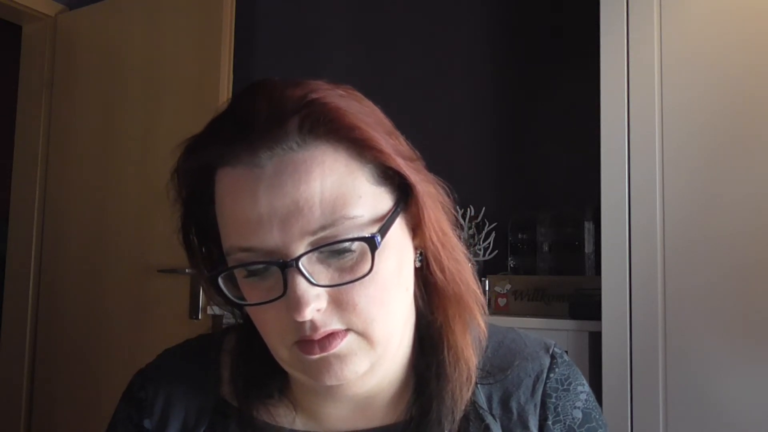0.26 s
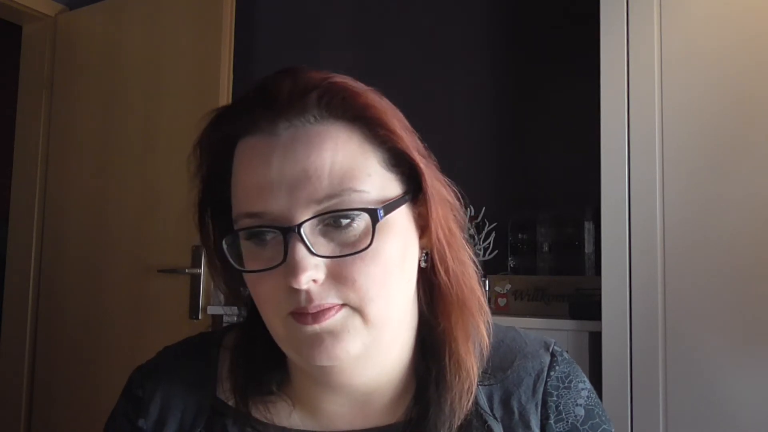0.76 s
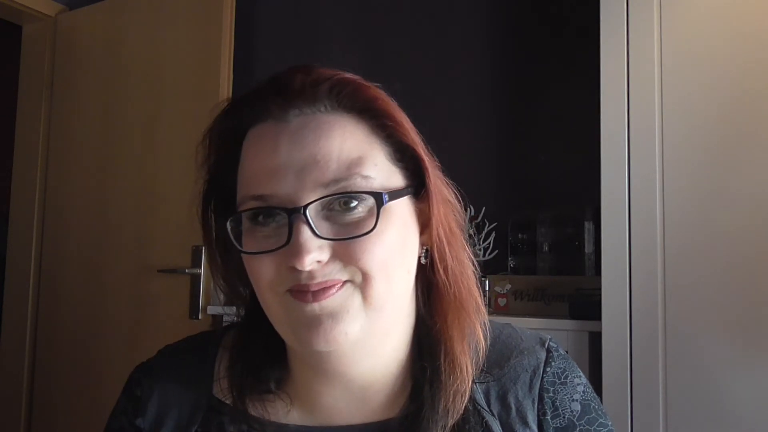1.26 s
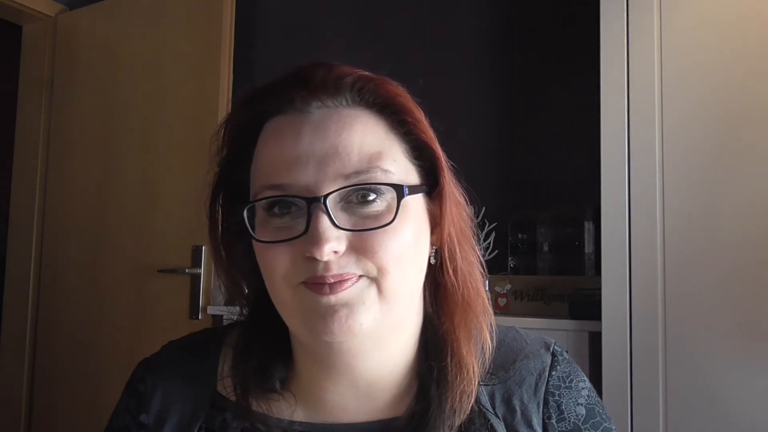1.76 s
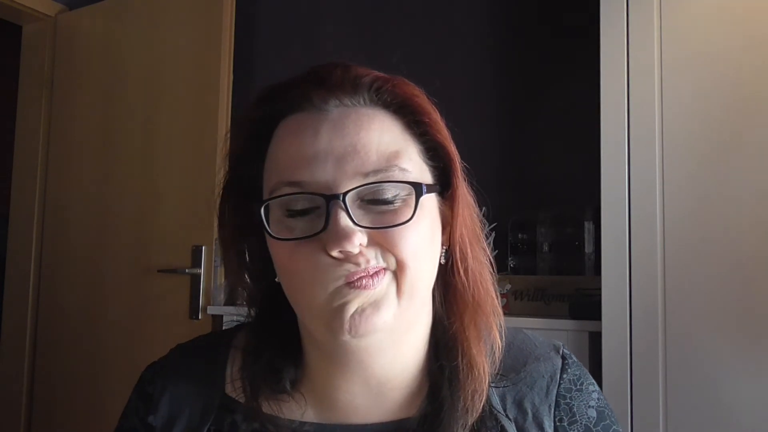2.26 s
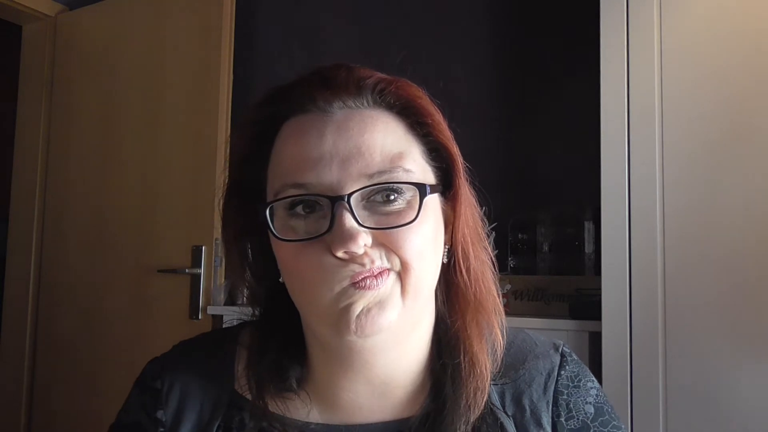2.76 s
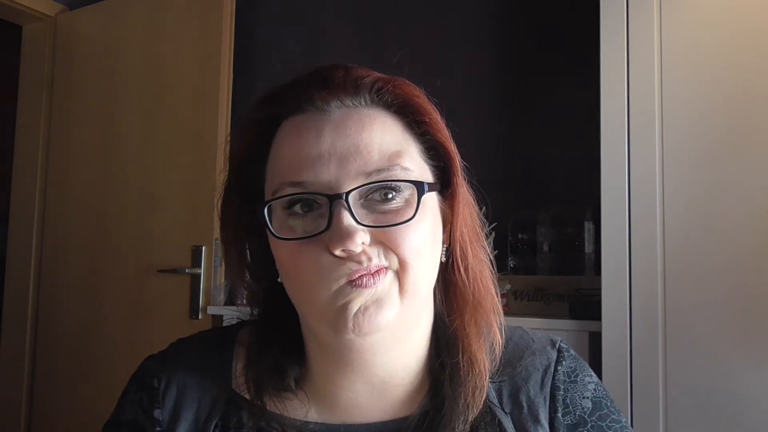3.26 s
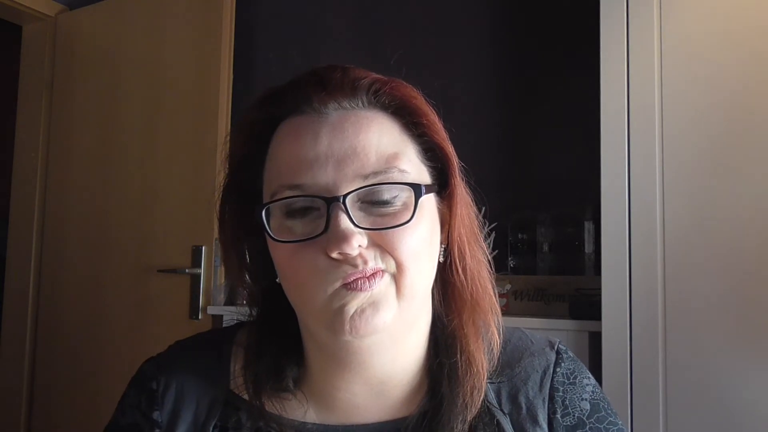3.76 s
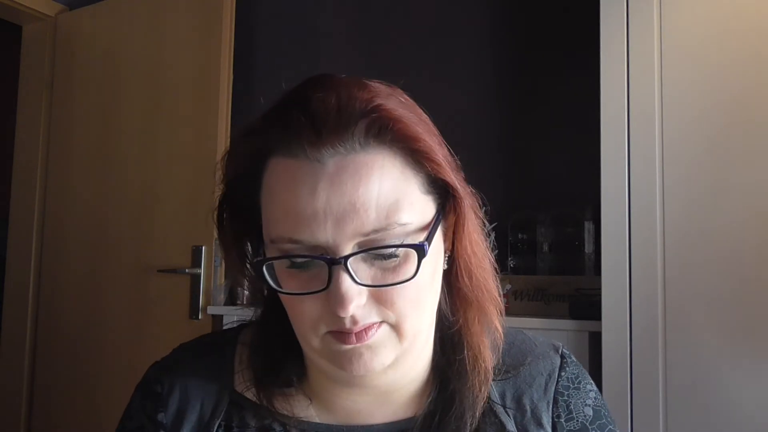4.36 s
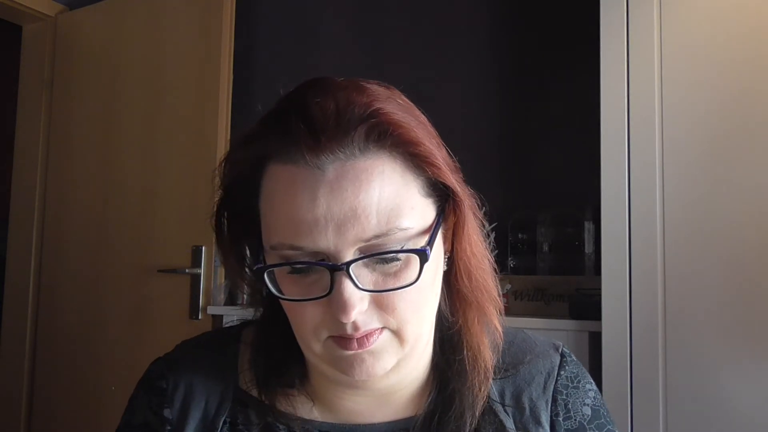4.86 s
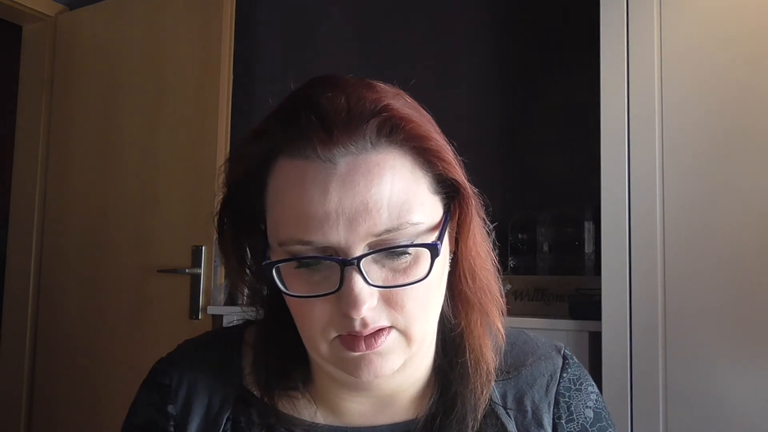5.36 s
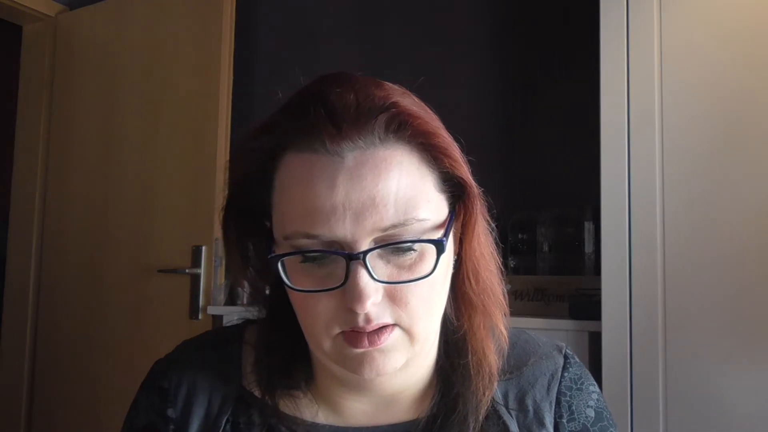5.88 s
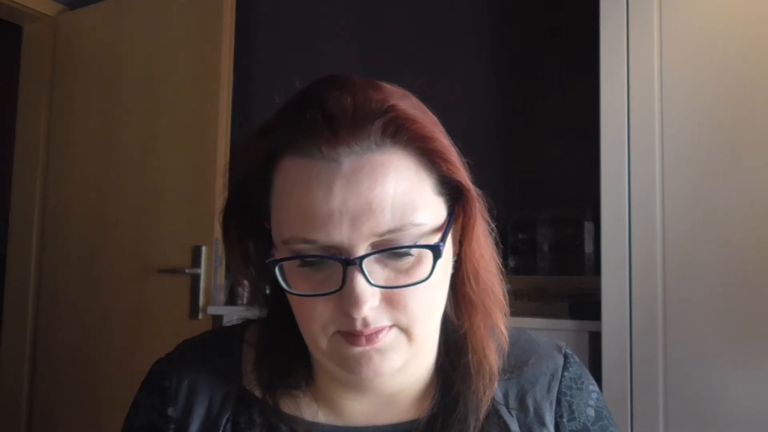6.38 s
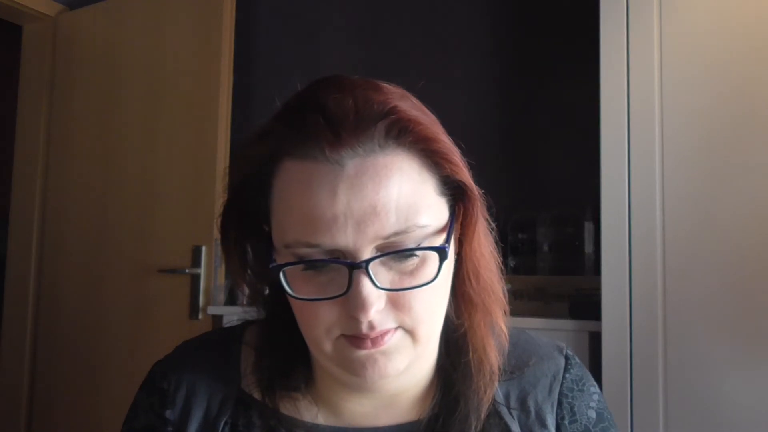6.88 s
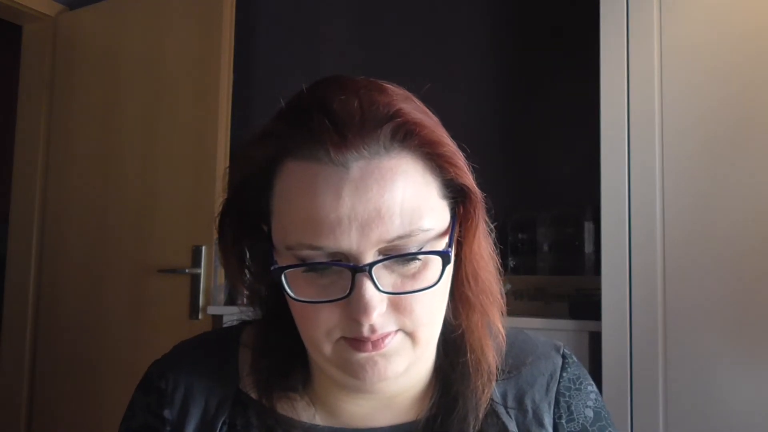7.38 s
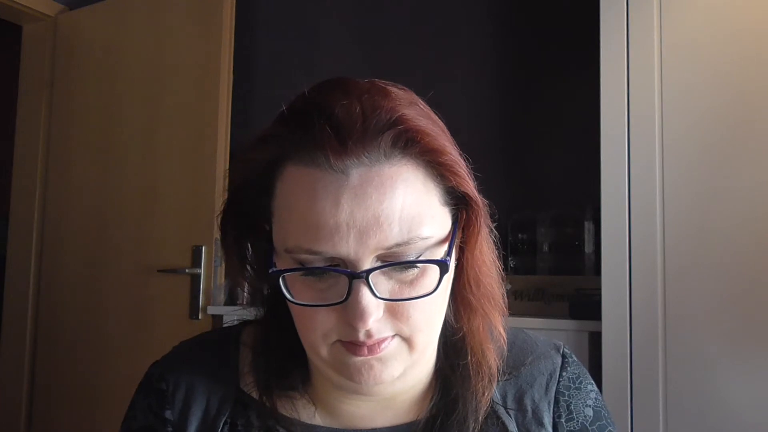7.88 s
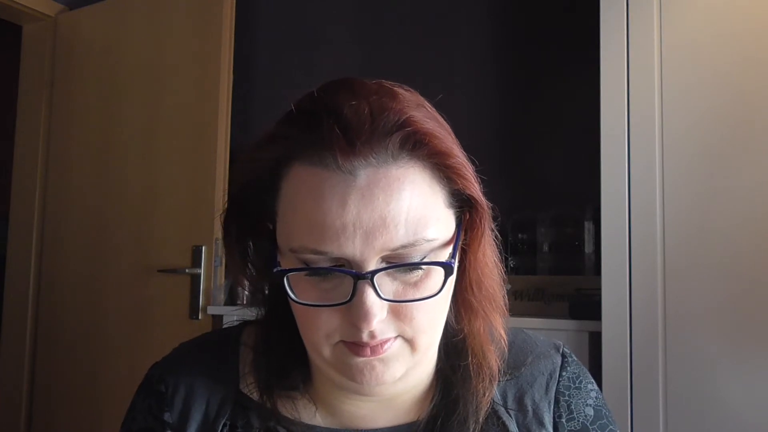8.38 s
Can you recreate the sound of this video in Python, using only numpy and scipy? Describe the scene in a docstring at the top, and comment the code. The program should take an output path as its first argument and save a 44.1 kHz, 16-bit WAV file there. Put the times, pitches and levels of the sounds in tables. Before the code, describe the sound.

Close in a small room, wrapping paper is picked at, rustled and torn in sharp rips over a hollow box, with a faint fan behind.

```python
"""Gift paper on a cardboard box rips, rustles and crinkles, close to the microphone in a small room.
Rips, rustle and creases are random fractures or short noise bursts, coloured by spectra.
Fingernail flicks add a scrape, a click and a hollow box knock; a fingertip scuffs the cardboard.
Bumps and friction drive the resonances of the box on the desk.
A fan hums faintly as coloured noise and wavering tones, with microphone hiss."""
import sys
import numpy as np
from scipy import signal
from scipy.fft import rfft, irfft
from scipy.io import wavfile
from scipy.ndimage import uniform_filter1d

SR = 44100
rng = np.random.default_rng(int(sys.argv[2]) if len(sys.argv) > 2 else 0)


def inscribe(sig):
    """Save sig as 16-bit PCM at rate SR to the path in sys.argv[1].

    A 1-D sig is mono; a 2-D sig holds one channel per row.
    Samples are clipped to [-1, 1] before scaling.
    """
    pcm = np.round(np.clip(np.atleast_2d(sig).T, -1, 1) * 32767)
    wavfile.write(sys.argv[1], SR, pcm.astype(np.int16))


N = 380583
SAMPLES_PER_MS = SR / 1000


def from_db(db):
    """Decibels to gain."""
    return 10 ** (np.asarray(db) / 20)


def rms_one(x):
    """Scale to rms 1."""
    return x / np.sqrt(np.mean(x ** 2) + 1e-20)


def unit_energy(x):
    """Scale each response to energy 1."""
    return x / np.sqrt(np.sum(x ** 2, axis=-1, keepdims=True) + 1e-20)


def gains(rows):
    """The dB columns of a curve as gains at every sample, silent outside it."""
    time_s, *columns_db = np.transpose(rows)
    t = np.arange(N) / SR
    inside = (t >= time_s[0]) * (t <= time_s[-1])
    return np.array([from_db(np.interp(t, time_s, db)) * inside for db in columns_db])


def at_hz(points, hz, column=1):
    """Read one column of a table on a log-frequency axis."""
    table = np.array(points)
    return np.interp(np.log(np.maximum(hz, 1)), np.log(table[:, 0]), table[:, column])


def drift(rate_hz):
    """Slow random wander: straight lines between Gaussian knots of spread 1."""
    knots = rng.standard_normal(N // 16)
    return np.interp(np.arange(N) * rate_hz / SR, np.arange(len(knots)), knots)


def convolve(x, response):
    """Play a signal through a mono or stereo response."""
    return signal.oaconvolve(np.atleast_2d(x), np.atleast_2d(response), axes=-1)[:, :N]


def causal(spectrum, size=4096):
    """Minimum-phase response of this spectrum, with energy 1."""
    spectrum_db = at_hz(spectrum, np.fft.rfftfreq(size, 1 / SR))
    cepstrum = irfft(np.log(from_db(spectrum_db)))
    # fold onto positive delays
    cepstrum[1:size // 2] *= 2
    cepstrum[size // 2 + 1:] = 0
    return unit_energy(irfft(np.exp(rfft(cepstrum))))


def colour(x, spectrum):
    """Filter that keeps the power of white sound."""
    return convolve(x, causal(spectrum))


def bandpass(x, low_hz, high_hz):
    """Third-order Butterworth band."""
    return signal.sosfilt(signal.butter(3, [low_hz, high_hz], "band", fs=SR, output="sos"), x)


def burst(decay_ms, ring_db, ring_ms, apart=0.23, pan_db=4.5, size=768):
    """One facet of paper flips: a sharp crack and a faint ring, a little different at each ear."""
    t_ms = np.arange(size) / SAMPLES_PER_MS
    shape = np.exp(-t_ms / decay_ms) + from_db(ring_db) * np.exp(-t_ms / ring_ms)
    mid, side = rng.standard_normal((2, size))
    sides = np.array([[1], [-1]])
    pan = from_db(sides * pan_db * rng.normal() / 2)
    return unit_energy(shape * (mid + apart * side * sides)) * pan


def strikes(times_s, levels_db, spectrum, decay_ms, ring_db, ring_ms, size=2048):
    """A burst at each time; its level is its energy spread over one millisecond, before panning."""
    out = np.zeros((2, N + size))
    weight = rms_one(from_db(at_hz(spectrum, np.fft.rfftfreq(size, 1 / SR))))
    for time_s, level_db in zip(times_s, levels_db):
        crack, at = burst(decay_ms, ring_db, ring_ms), int(time_s * SR)
        coloured_rms = np.sqrt(np.mean(np.abs(rfft(crack, size) * weight) ** 2))
        out[:, at:at + crack.shape[1]] += crack * from_db(level_db) * np.sqrt(SAMPLES_PER_MS) / coloured_rms
    return colour(out[:, :N], spectrum)


def fractures(per_s, spread_db, even_ms):
    """Tiny breaks of uneven size at random moments; the steady pull evens their power out."""
    sizes = from_db(spread_db * np.minimum(rng.exponential(1, N), 4))
    clicks = (rng.random(N) < per_s / SR) * sizes
    power = uniform_filter1d(clicks ** 2, max(int(even_ms * SAMPLES_PER_MS), 2))
    return clicks / np.sqrt(np.abs(power) + per_s / SR / 2)


def facets(clicks, decay_ms, ring_db, ring_ms=1.9, count=20):
    """Each break is radiated by one of many facets of the sheet."""
    dealt, signs = rng.integers(0, count, N), rng.choice([-1, 1], N)
    return sum(convolve(clicks * signs * (dealt == k), burst(decay_ms, ring_db, ring_ms))
               for k in range(count))


def wavering_tone(hz, width_hz):
    """A line whose strength and phase wander; rms 1."""
    turn = 2 * np.pi * hz * np.arange(N) / SR
    return rms_one((1 + drift(width_hz)) * np.sin(turn) + drift(width_hz) * np.cos(turn))


def steady_noise(spectrum, level_db, apart):
    """Coloured noise, partly shared by both channels."""
    mid, side = rng.standard_normal((2, N))
    return from_db(level_db) * rms_one(colour(mid + apart * side * [[1], [-1]], spectrum))


# fan noise: (frequency [Hz], relative density [dB per Hz])
FAN_SPECTRUM = [(20, -30.5), (50, -9), (100, -4.5), (140, -2.5), (175, -3.5), (215, 0), (330, -2.5),
                (600, -9.5), (780, -10.5), (930, -3.5), (1150, -14.5), (1550, -12), (2100, -39.5),
                (5700, -27.5)]
# microphone hiss: (frequency [Hz], relative density [dB per Hz])
HISS_SPECTRUM = [(1000, -4.5), (3000, -6.5), (6000, -8), (8000, -2), (11000, 0.5), (14000, -5),
                 (16000, -15.5)]
# fan tones: (frequency [Hz], relative level [dB])
FAN_TONES = [(134.6, -9), (213, -1.5), (931, -11.5)]
# swell of the fan tones: (time [s], level before trim [dB])
FAN_SWELL = [(0, -73.5), (1.5, -69.5), (2.7, -75), (3.2, -70), (4.1, -64), (4.7, -66), (5.6, -66),
             (5.9, -59), (6.9, -66), (7.6, -63), (8, -80), (8.63, -74)]


def background():
    """A fan with wavering tones, and the hiss of the microphone."""
    trim = from_db(-4.0)
    tones = sum(from_db(db) * wavering_tone(hz, width_hz=14) for hz, db in FAN_TONES)
    fan = steady_noise(FAN_SPECTRUM, level_db=-63.5, apart=1.0) + trim * tones * gains(FAN_SWELL)[0]
    return fan + steady_noise(HISS_SPECTRUM, level_db=-68.0, apart=0.8)


# room: (frequency [Hz], t60 [s], reverberant energy against direct [dB])
ROOM_DECAY = [(146, 0.23, -4), (600, 0.2, -3), (1490, 0.3, -4.5), (3960, 0.28, -4), (7700, 0.26, -7),
              (12150, 0.074, -11), (16000, 0.25, -9)]


def room(x, alike=0.53, gap_ms=0.71, wall_ms=8.4, wall_db=-20, count=12):
    """A diffuse tail, decaying at its own rate in each band, and one echo off a near wall."""
    t = np.arange(SR // 2) / SR
    onset = np.clip(t * SR / SAMPLES_PER_MS / gap_ms - 1, 0, 1)
    edges_hz, response = np.geomspace(60, 17000, count + 1), 0
    for low, high in zip(edges_hz, edges_hz[1:]):
        hz, share = np.sqrt(low * high), (high - low) / (SR / 2)
        mid, side = bandpass(rng.standard_normal((2, len(t))), low, high)
        noise = np.sqrt(1 + alike) * mid + np.sqrt(1 - alike) * side * [[1], [-1]]
        shape = onset * np.exp(-np.log(1000) * t / at_hz(ROOM_DECAY, hz))
        level = np.sqrt(share) * from_db(at_hz(ROOM_DECAY, hz, column=2))
        response = response + unit_energy(noise * shape) * level
    for channel in range(2):
        response[channel, int(wall_ms * SAMPLES_PER_MS) + 2 * channel] += from_db(wall_db)
    return convolve(x, response)


# box shoved over the desk: (start [s], length [s], level at start [dB])
DESK_SHOVES = [(1.403, 0.0086, -60.5), (3.39, 0.026, -59.5), (4.388, 0.42, -55), (4.993, 0.072, -59.5),
               (5.305, 0.24, -65), (5.549, 0.3, -61.5), (6.842, 0.013, -59), (7.023, 0.0085, -64.5),
               (7.801, 0.0096, -62)]
SHOVE_ATTACK_S, SHOVE_RELEASE_S, SHOVE_SAG_DB_PER_S = 0.013, 0.018, 18


def shove_level():
    """Friction is strongest as the box starts to move, eases while it slides and dies as it stops."""
    out = 0
    for start_s, length_s, level_db in DESK_SHOVES:
        t = np.arange(N) / SR - start_s
        attack = np.clip(1 + t / SHOVE_ATTACK_S, 0, 1)
        release = np.exp(-np.clip((t - length_s) / SHOVE_RELEASE_S, 0, 20))
        sag_db = SHOVE_SAG_DB_PER_S * np.clip(t, 0, length_s)
        out = out + attack * release * from_db(level_db - sag_db)
    return out


# box bumping on the desk: (time [s], level [dB], its two lowest modes against the others [dB])
DESK_BUMPS = [(3.541, -41, -29), (4.391, -37, -6), (4.396, -33, -4), (4.402, -70, -4), (4.429, -38.5, 2),
              (4.439, -58, 0), (7.869, -52, 11.5)]
# resonances of the box on the desk: (frequency [Hz], width [Hz], relative level [dB])
BOX_DESK_MODES = [(125, 170, -13.5), (188.6, 170, -1), (486, 87, 4.5), (710, 110, -13.5), (1170, 160, -3),
                  (1220, 84, -28)]


def box_on_desk():
    """Bumps and sliding friction drive the same hollow resonances."""
    friction = rng.standard_normal(N) * shove_level()
    time_s, level_db, low_db = np.transpose(DESK_BUMPS)
    t = np.arange(SR // 10) / SR
    modes = np.array([from_db(db) * width_hz * np.exp(-np.pi * width_hz * t) * np.cos(2 * np.pi * hz * t)
                      for hz, width_hz, db in BOX_DESK_MODES])
    out = 0
    for k, mode in enumerate(modes / np.sqrt(np.sum(modes ** 2))):
        force = friction.copy()
        force[(time_s * SR).astype(int)] += np.sqrt(SAMPLES_PER_MS) * from_db(level_db + low_db * (k < 2))
        out = out + convolve(force, mode)
    return bandpass(out + 1e-18, 80, 1600)


# short dull scuffs on the cardboard: (time [s], level [dB])
CARDBOARD_SCUFFS = [(8.209, -39), (8.220, -39.5), (8.229, -48), (8.245, -51), (8.262, -51)]
# scuffed cardboard: (frequency [Hz], relative density [dB per Hz])
SCUFF_SPECTRUM = [(200, -48), (700, -12), (1000, -3.5), (1500, 0), (2200, -8), (3200, -14.5), (6000, -25.5),
                  (15000, -28)]


def scuffs():
    """A fingertip stutters over the cardboard."""
    time_s, level_db = np.transpose(CARDBOARD_SCUFFS)
    return strikes(time_s, level_db, SCUFF_SPECTRUM, decay_ms=5.8, ring_db=-10, ring_ms=6.8)


# fingers brushing over the paper, a row a stroke: (middle [s], length [s], peak level [dB])
FINGER_STROKES = [(0.195, 0.22, -69.5), (0.507, 0.1, -52), (0.577, 0.11, -58.5), (1.388, 0.25, -59.5),
                  (1.88, 0.055, -65), (2.266, 0.1, -64.5), (2.444, 0.049, -52), (2.548, 0.12, -52.5),
                  (2.613, 0.074, -51.5), (2.692, .3, -61.5), (3.007, 0.058, -57), (3.392, 0.16, -54),
                  (3.695, 0.15, -57.5), (3.802, 0.055, -43.5), (4.038, 0.24, -55.5), (4.15, 0.086, -59),
                  (4.443, 0.25, -52.5), (4.56, 0.14, -45.5), (4.65, .12, -57.5), (4.973, 0.33, -59),
                  (5.115, 0.32, -52), (5.331, 0.12, -50), (5.432, 0.042, -46), (5.53, .06, -52.5),
                  (5.63, 0.03, -48.5), (5.722, 0.04, -43.5), (5.806, 0.064, -52), (5.9, 0.022, -45),
                  (6.851, 0.082, -58), (6.996, 0.32, -59.5), (7.227, 0.11, -55), (7.356, 0.3, -63.5),
                  (7.56, 0.43, -67), (7.867, 0.054, -58), (8.258, 0.2, -59), (8.353, 0.15, -52.5),
                  (8.517, 0.095, -53)]
# hands working the paper between strokes: (start [s], end [s], level [dB])
HELD_PAPER = (3.7, 5.86, -62)
STROKE_ROUNDING = 2   # power of the half sine of finger speed


def stroke_level():
    """Each stroke swells and fades with the speed of the finger, over the faint stir of the held paper."""
    out = np.zeros(N + SR)
    start_s, end_s, held_db = HELD_PAPER
    out[int(start_s * SR):int(end_s * SR)] = from_db(held_db)
    for middle_s, length_s, level_db in FINGER_STROKES:
        half_turn = np.linspace(0, np.pi, int(length_s * SR), endpoint=False)
        swell = np.sin(half_turn) ** STROKE_ROUNDING
        at = max(int((middle_s - length_s / 2) * SR), 0)
        span = slice(at, at + len(swell))
        out[span] = np.hypot(out[span], from_db(level_db) * swell)
    return out[:N]


# skin or nail brushing paper: (frequency [Hz], relative density [dB per Hz])
BRUSH_SPECTRUM = [(100, -20.5), (450, -6), (1200, -13), (2500, -14.5), (3900, -10), (6000, -10),
                  (7600, -2.5), (11000, 1.5), (14000, -4), (16000, -24)]


def rustle(brushing):
    """Skin rubbing on paper: fine dense grains."""
    grains = fractures(per_s=2600, spread_db=3.0, even_ms=72) * brushing
    return colour(facets(grains, decay_ms=0.23, ring_db=-9.5), BRUSH_SPECTRUM)


# small random snaps: rate over the whole scene, level above the driving crackle or rustle
TEAR_SNAPS_PER_S, TEAR_SNAP_DB = 50, 6.5
CREASE_SNAPS_PER_S, CREASE_SNAP_DB = 32, 4
SNAP_SCATTER_DB, SNAP_LOWER_DB = 3.5, -22.5   # rms scatter; lower treble against top
STRAY_LIMIT_DB = -21   # thin fibre bundles: ceiling before scatter


def stray_snaps(drive, per_s, above_db):
    """Rows of small snaps, unevenly spaced, their level following the movement that causes them."""
    count = int(per_s * N / SR)
    place, top, lower = rng.random((count, 3)).T
    at = ((np.arange(count) + place) * N / count).astype(int)
    level_db = np.minimum(20 * np.log10(drive[at] + 1e-9) + above_db, STRAY_LIMIT_DB)
    scatter_db = SNAP_SCATTER_DB * np.sqrt(3) * (2 * np.array([top, lower]) - 1)
    top_db, lower_db = level_db + scatter_db
    return np.column_stack([at / SR, top_db, lower_db + SNAP_LOWER_DB])[drive[at] > 0]


# creases buckling, fibre bundles snapping: (time [s], top treble [dB], lower treble [dB])
LOUD_SNAPS = [(0.5715, -39.5, -45), (1.204, -50, -55), (1.5187, -38.5, -50), (1.9873, -38, -64),
              (2.445, -41.5, -51.5), (2.918, -70, -58.5), (2.9363, -48.5, -72), (3.1463, -46, -41),
              (3.2415, -41, -66), (3.255, -27.5, -30), (3.6267, -48, -72), (3.7694, -42, -68),
              (3.7949, -23.5, -36.5), (3.8143, -27, -63), (3.8362, -31, -63), (3.877, -34, -64),
              (3.884, -25.5, -51), (3.9479, -31.5, -55), (4.07, -35, -58), (4.1452, -25.5, -51),
              (4.1564, -22, -44.5), (4.2006, -27, -42), (4.223, -16.5, -29), (4.261, -15.5, -43),
              (4.303, -20.5, -30), (4.3442, -32.5, -50), (4.3764, -30.5, -36.5), (4.43, -33.5, -42.5),
              (4.498, -31, -47), (4.5353, -32, -64), (4.634, -40.5, -58), (4.6585, -42, -53),
              (4.7012, -38, -53), (4.739, -31, -46), (4.7745, -26, -33.5), (4.7968, -17, -21),
              (4.803, -19, -30), (4.837, -19, -50), (5.0204, -31.5, -42), (5.396, -34, -49),
              (5.5906, -49, -46), (5.63, -42, -49), (5.8728, -45.5, -67), (5.911, -19.5, -43.5),
              (5.935, -16.5, -42), (5.956, -30, -47.5), (5.968, -15.5, -32.5), (5.9754, -18.5, -55.5),
              (5.9943, -20, -30), (6.0026, -17.5, -27), (6.036, -22, -31), (6.09, -28, -26),
              (6.107, -21, -29), (6.149, -20.5, -42), (6.183, -16.5, -31), (6.1993, -20, -41),
              (6.247, -25.5, -49), (6.3996, -28, -32), (6.416, -20, -28.5), (6.4477, -27, -45),
              (6.4872, -16, -48), (6.516, -16.5, -44.5), (6.5511, -18.5, -52), (6.5988, -23.5, -47),
              (6.6412, -20.5, -50), (6.671, -18, -49), (6.7034, -15.5, -51.5), (6.7195, -24, -47),
              (6.7339, -19, -50), (6.971, -37, -65)]
# breaking fibres, top treble: (frequency [Hz], relative density [dB per Hz])
FIBRE_SPECTRUM = [(2500, -36), (5000, -17.5), (6400, -13), (7400, -3), (9400, -5), (10800, 0), (12500, -4),
                  (14800, -13), (16000, -26.5)]
# rasp, lower treble: (frequency [Hz], relative density [dB per Hz])
RASP_SPECTRUM = [(150, -38), (1000, -18), (1500, -12.5), (2000, -9.5), (2600, -11.5), (3200, -6),
                 (3900, -2.5), (5000, -4.5), (6200, -6), (7500, -4.5), (11000, -25.5)]


def snaps(crackle, brushing):
    """Single creases pop: very short and bright. Tearing and brushing set off smaller, drier ones."""
    time_s, top_db, lower_db = np.transpose(LOUD_SNAPS)
    top = strikes(time_s, top_db, FIBRE_SPECTRUM, decay_ms=0.24, ring_db=-9.5, ring_ms=3.7)
    lower = strikes(time_s, lower_db, RASP_SPECTRUM, decay_ms=0.29, ring_db=-8.0, ring_ms=5.0)
    torn = stray_snaps(crackle, TEAR_SNAPS_PER_S, TEAR_SNAP_DB)
    creased = stray_snaps(brushing, CREASE_SNAPS_PER_S, CREASE_SNAP_DB)
    time_s, top_db, lower_db = np.vstack([torn, creased]).T
    small = sum(strikes(time_s, db, spectrum, decay_ms=0.22, ring_db=-13, ring_ms=2.4)
                for db, spectrum in [(top_db, FIBRE_SPECTRUM), (lower_db, RASP_SPECTRUM)])
    return top + lower + small


# nail slipping off the tape: (time [s], click [dB], lower treble [dB], box knock [dB],
# corner above which the contact is too soft to excite the box [Hz])
NAIL_FLICKS = [(0.3081, -24, -31.5, -30, 800), (0.589, -42, -36.5, -51, 1000), (0.953, -26, -38, -27, 714),
               (0.9674, -25, -40.5, -30.5, 870), (1.1698, -44, -53, -45.8, 890),
               (1.336, -37, -39, -43.5, 900), (2.125, -14.5, -29.5, -23.5, 1120),
               (2.381, -35.5, -46, -50, 700), (3.1488, -19.5, -26.5, -30.5, 540),
               (3.2512, -30, -41, -26.5, 1020), (3.5388, -45.5, -52.0, -39.5, 600),
               (5.4342, -33, -43.5, -42.5, 600), (5.7152, -35.5, -41, -40.5, 1220),
               (7.296, -37, -48, -49, 1330), (7.868, -48.5, -43.5, -58, 700)]
# knock of the box: (frequency [Hz], relative density [dB per Hz])
KNOCK_SPECTRUM = [(40, -29), (130, -12), (270, -8), (480, 4.5), (600, -3.5), (720, 1), (950, -2),
                  (1200, 1.5), (1550, -5.5), (2050, 3), (2700, -7.5), (6000, -20)]


def flicks(scrape_db=-25, scrape_ms=2.4):
    """The nail scrapes briefly, slips and clicks on the taut paper; the hollow box knocks under it."""
    time_s, click_db, lower_db, knock_db, contact_hz = np.transpose(NAIL_FLICKS)
    starts = (time_s * SR).astype(int)
    click = strikes(time_s, click_db, FIBRE_SPECTRUM, decay_ms=0.8, ring_db=-17, ring_ms=3.3)
    lower = strikes(time_s, lower_db, RASP_SPECTRUM, decay_ms=1.05, ring_db=-14.5, ring_ms=4.5)
    hz, box_db = np.transpose(KNOCK_SPECTRUM)
    knocks, slips = np.zeros(N), np.zeros(N)
    for at, level_db, corner_hz in zip(starts, knock_db, contact_hz):
        softness_db = 10 * np.log10(1 + (hz / corner_hz) ** 4)
        knock = causal(np.column_stack([hz, box_db - softness_db]))[:N - at]
        knocks[at:at + len(knock)] += knock * from_db(level_db) * np.sqrt(SAMPLES_PER_MS)
    slips[starts] = from_db(click_db + scrape_db)
    # time-reversed decay: friction grows until the nail lets go
    pole = np.exp(-1 / (scrape_ms * SAMPLES_PER_MS))
    grip = signal.lfilter([1], [1, -pole], slips[::-1] + 1e-18)[::-1]
    return click + lower + knocks + colour(grip * rng.standard_normal(N), BRUSH_SPECTRUM)


# level curves of five rips, the last two each in two stretches: (time [s], treble crackle before trim [dB], low
# flapping before trim [dB])
RIP_CURVES = [
    [(3.868, -47, -84), (3.876, -58, -90), (3.882, -37, -52.5), (3.904, -33, -49), (3.942, -39, -68.5),
     (3.965, -54, -69)],
    [(4.205, -44, -69), (4.213, -41, -74), (4.223, -26, -45), (4.299, -39.5, -63), (4.303, -39, -55),
     (4.32, -56, -67)],
    [(4.72, -56, -64), (4.736, -32, -56.5), (4.754, -49, -61), (4.784, -33, -53), (4.8, -16.5, -40.5),
     (4.86, -48, -49)],
    [(5.945, -33, -64), (6.003, -23.5, -48), (6.057, -33.5, -57), (6.105, -24, -40.5), (6.157, -54, -45.5),
     (6.17, -64, -64)],
    [(6.175, -46, -60), (6.183, -32, -46.5), (6.199, -27.5, -46), (6.217, -46, -56), (6.231, -52, -59),
     (6.245, -36, -48)],
    [(6.335, -52, -70), (6.351, -37.5, -54), (6.367, -30.5, -48), (6.523, -31.5, -41.5),
     (6.607, -35.5, -59.5), (6.625, -35, -56)],
    [(6.625, -38, -59), (6.653, -29, -45), (6.687, -31, -49), (6.709, -28.5, -43.5), (6.739, -37.5, -47.5),
     (6.77, -67, -71)],
]
# trim of each curve in turn: (crackle [dB], rasp [dB], flapping [dB])
RIP_TRIMS = [(-1.5, 4.5, -4), (-1.5, -2, -2), (-1, -0.5, 0), (-3, 2.5, 0), (-2, -2.5, -0.5), (-2.5, -6, 1),
             (-2.5, -6.5, 1)]
RASP_FOLLOWS_SHEET = 0.58   # share of flapping in the rasp level, the rest crackle


def rip_levels():
    """Gains of crackle, rasp and flapping over all rips; the rasp follows the other two."""
    share, out = RASP_FOLLOWS_SHEET, 0
    for curve, trim_db in zip(RIP_CURVES, RIP_TRIMS):
        crackle, flap = gains(curve)
        rasp = crackle ** (1 - share) * flap ** share
        out = out + np.array([crackle, rasp, flap]) * from_db(trim_db)[:, None]
    return out


# flapping sheet: (frequency [Hz], relative density [dB per Hz])
SHEET_SPECTRUM = [(60, -32), (220, -10.5), (330, -13), (460, -0.5), (760, -1), (1000, -2), (1600, -8.5),
                  (2200, -14.5), (3000, -27), (6000, -29)]


def rips(crackle, rasp, flap):
    """A running tear breaks fibres by the hundred; its jerks shake the loose sheet, which flutters on its own."""
    breaks = fractures(per_s=1000, spread_db=2.5, even_ms=12)
    top = colour(facets(breaks * crackle, decay_ms=.16, ring_db=-10), FIBRE_SPECTRUM)
    jerks = (breaks + fractures(per_s=500, spread_db=0.5, even_ms=50)) / np.sqrt(2)
    lower = colour(facets(jerks * rasp, decay_ms=.32, ring_db=-9), RASP_SPECTRUM)
    flutter = from_db(2.95 * drift(60))
    sheet = colour(facets(jerks * flap * flutter, decay_ms=0.96, ring_db=-17.0), SHEET_SPECTRUM)
    return top + lower + sheet


def scene(count=2):
    """Paper and box lie nearly straight ahead; flick echoes sum separately drawn flicks and rooms."""
    (crackle, rasp, flap), brushing = rip_levels(), stroke_level()
    paper = rips(crackle, rasp, flap) + rustle(brushing) + snaps(crackle, brushing)
    present = paper + scuffs() + box_on_desk()
    flick_echoes = sum(room(flicks(), wall_db=-23) for _ in range(count)) / np.sqrt(count)
    near = present + flicks() + room(present) + flick_echoes
    balance = from_db([[-.15], [.15]])
    return near * balance + background()


LEFT_DULLING = 0.064   # weight of each neighbouring sample
CUTOFF_HZ = 15900


def record(dry):
    """The left microphone is a little duller; the top is cut steeply."""
    left = np.convolve(dry[0], [LEFT_DULLING, 1 - 2 * LEFT_DULLING, LEFT_DULLING], "same")
    lowpass = signal.ellip(10, .2, 80, CUTOFF_HZ, fs=SR, output="sos")
    return signal.sosfilt(lowpass, np.array([left, dry[1]]))


dry = scene()
out = record(dry)
inscribe(out)
```